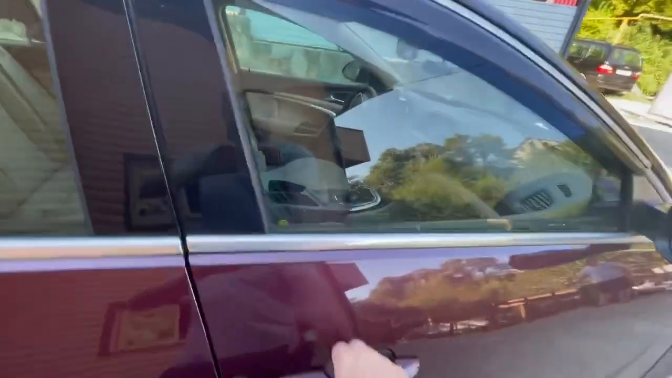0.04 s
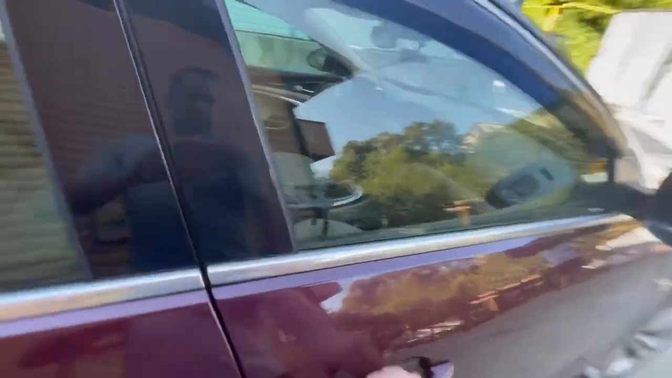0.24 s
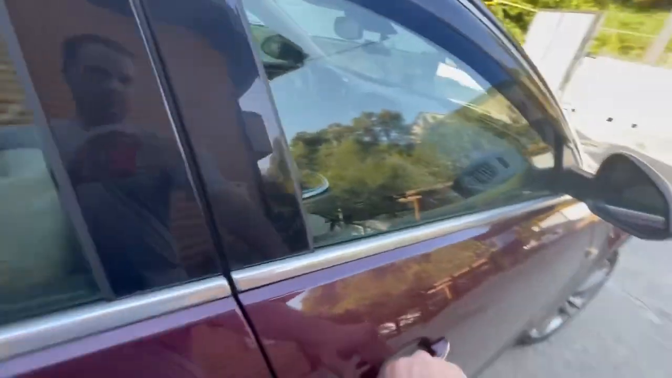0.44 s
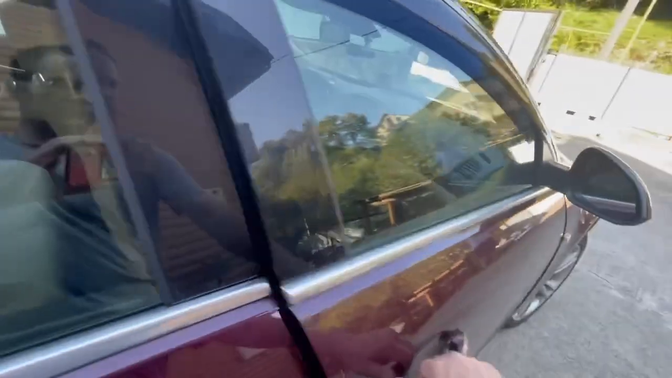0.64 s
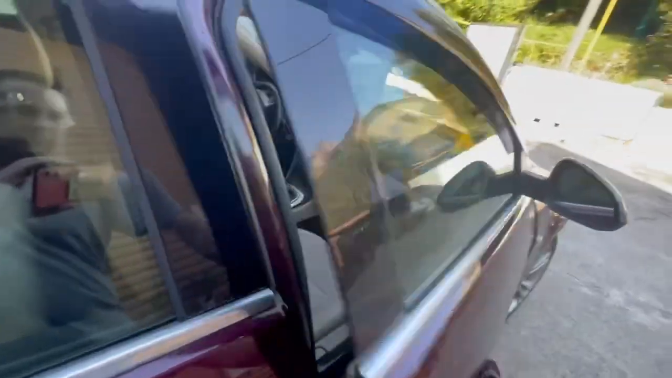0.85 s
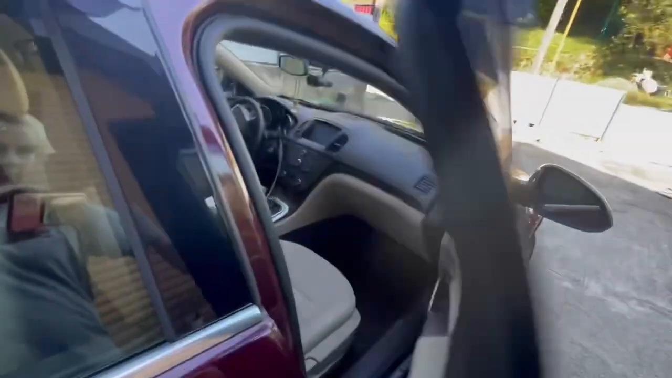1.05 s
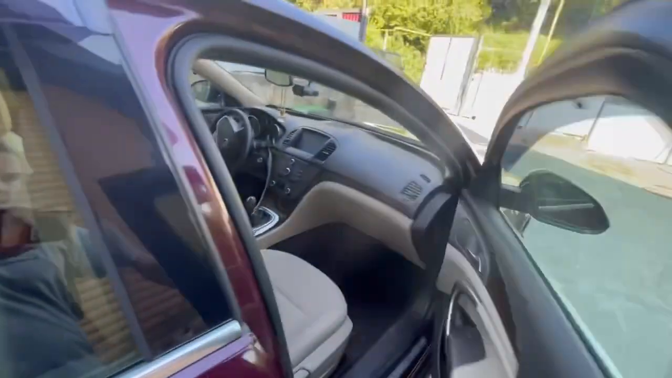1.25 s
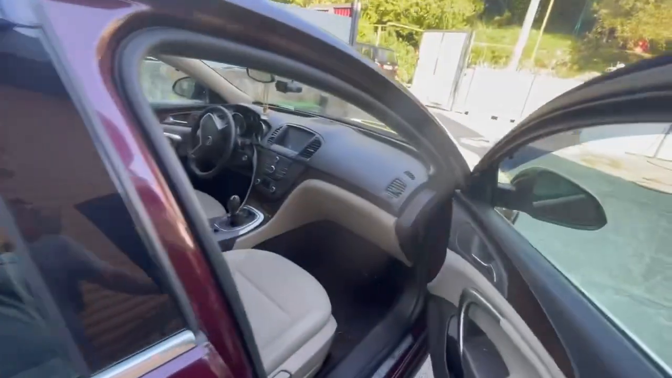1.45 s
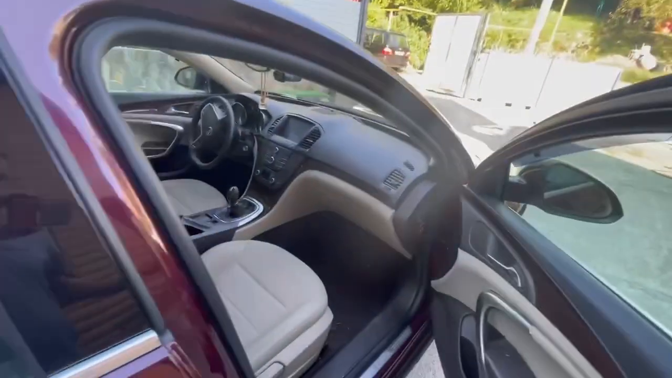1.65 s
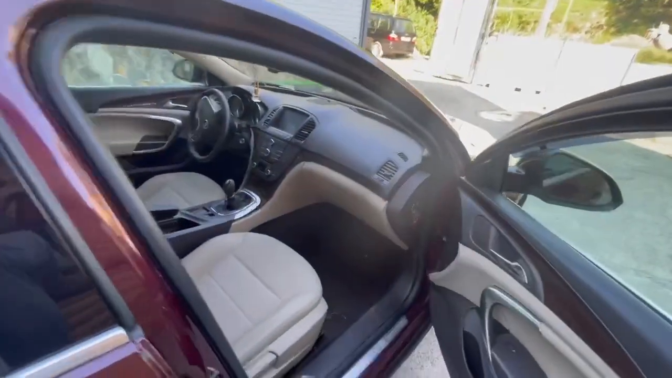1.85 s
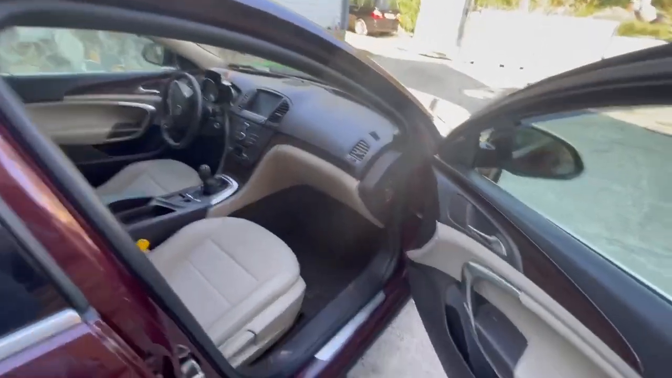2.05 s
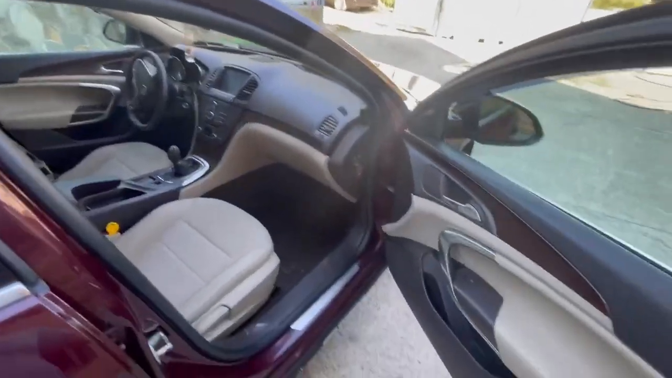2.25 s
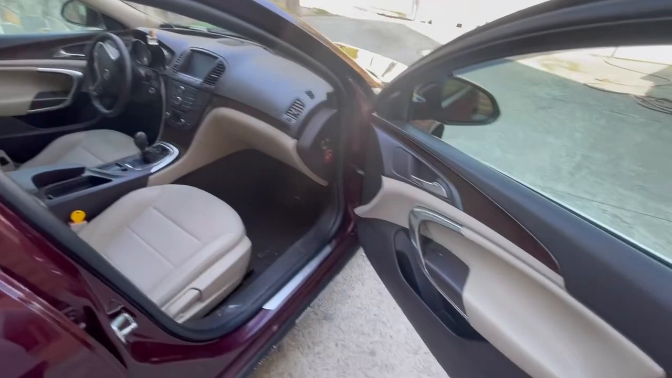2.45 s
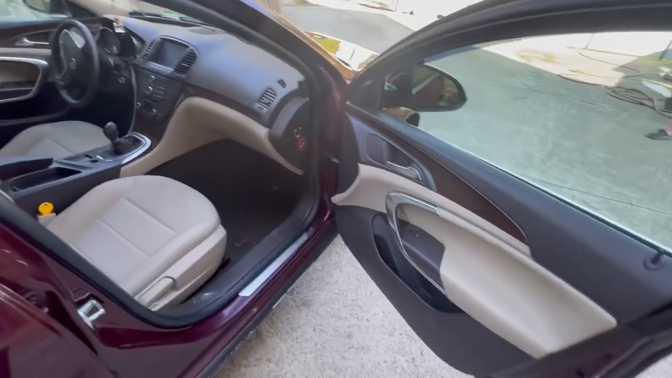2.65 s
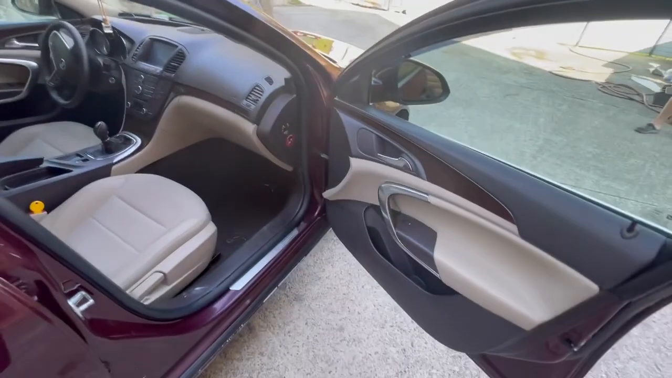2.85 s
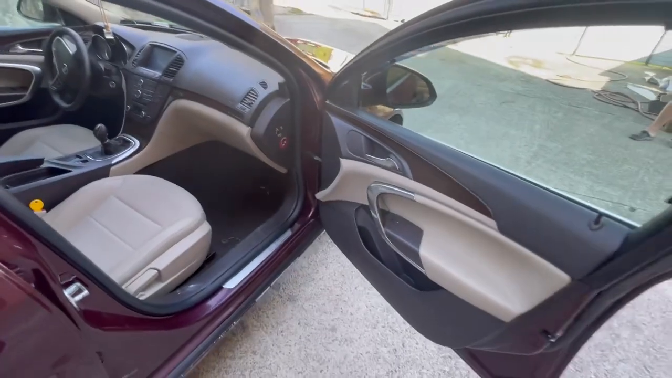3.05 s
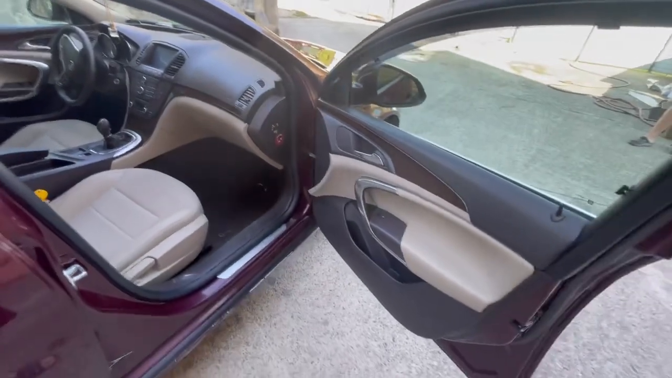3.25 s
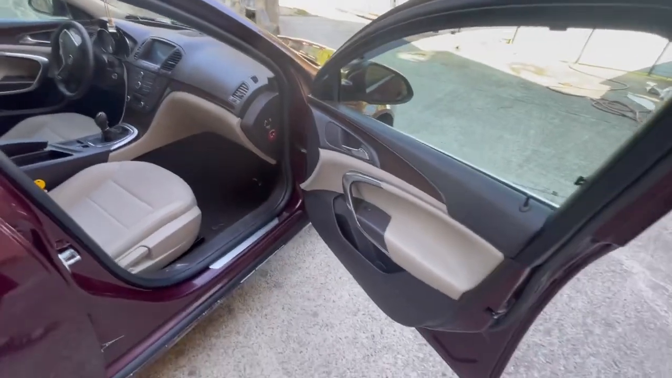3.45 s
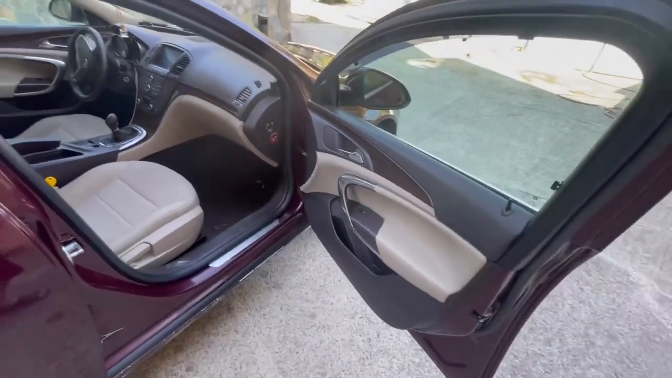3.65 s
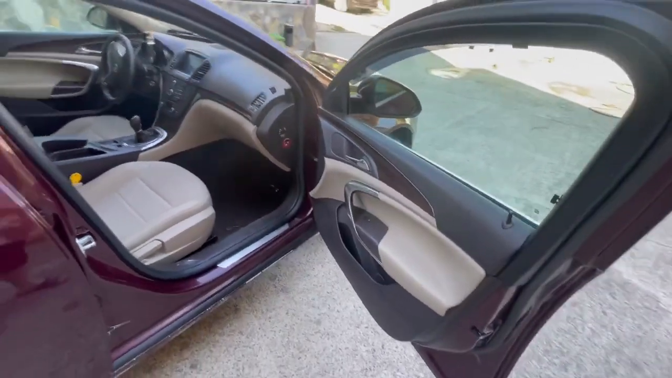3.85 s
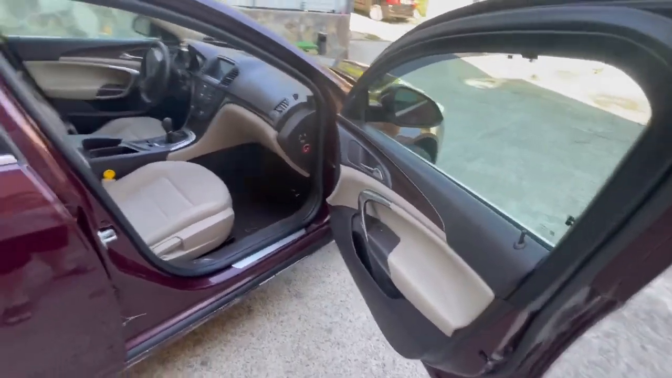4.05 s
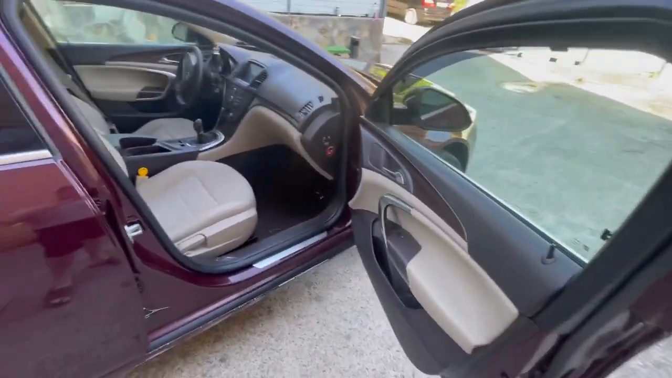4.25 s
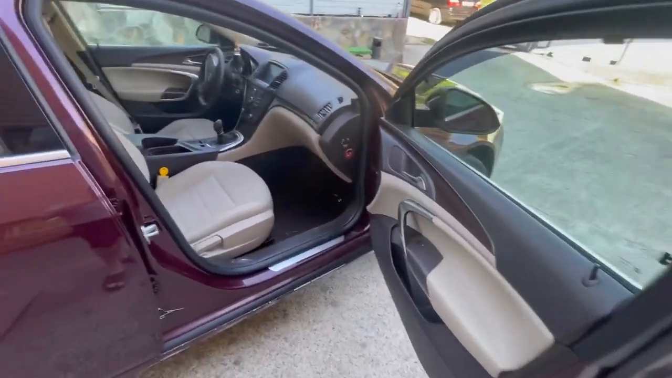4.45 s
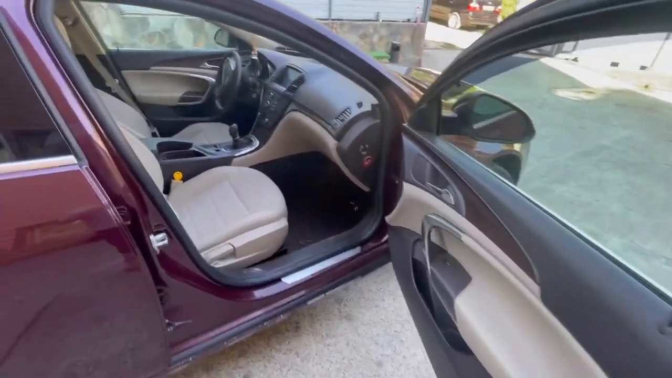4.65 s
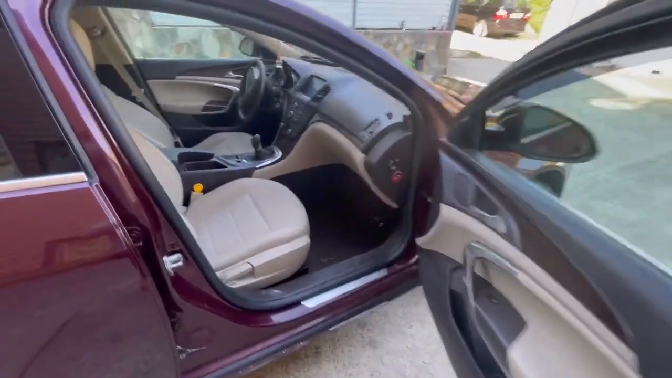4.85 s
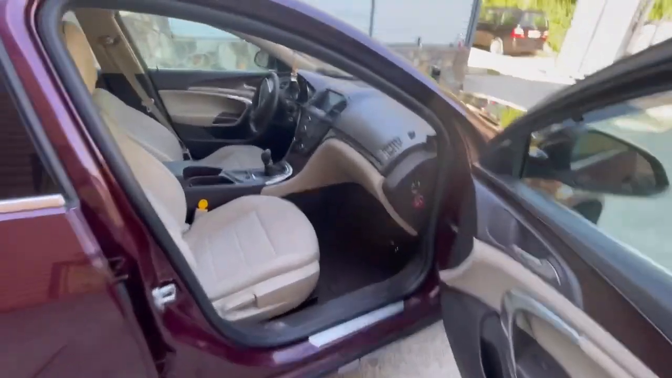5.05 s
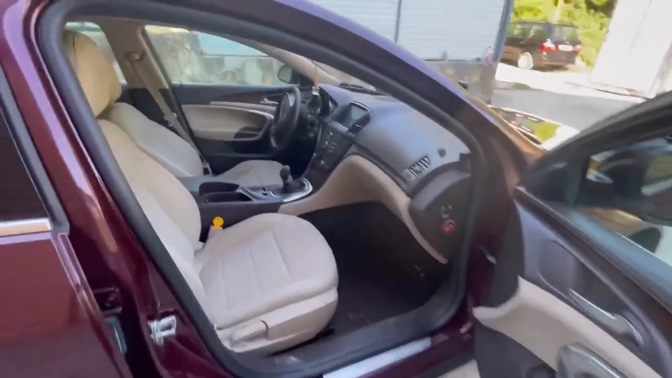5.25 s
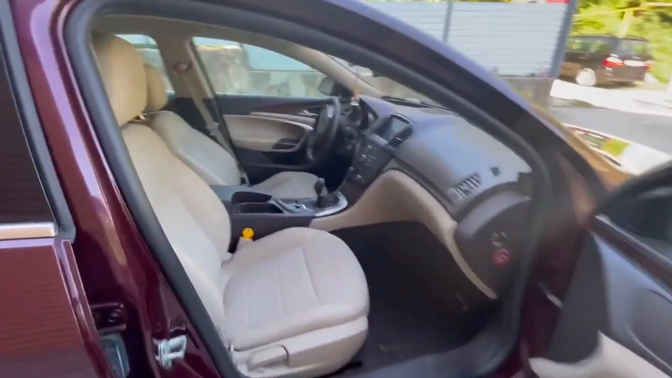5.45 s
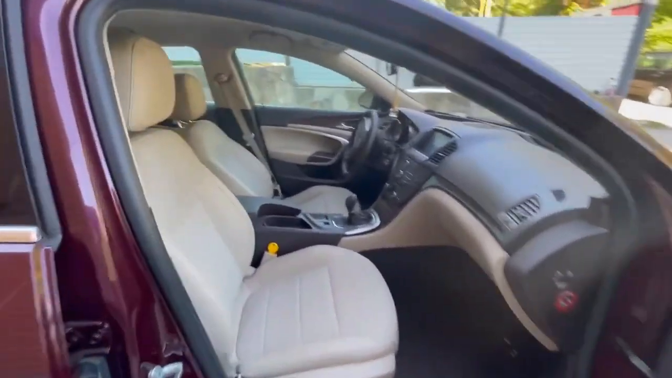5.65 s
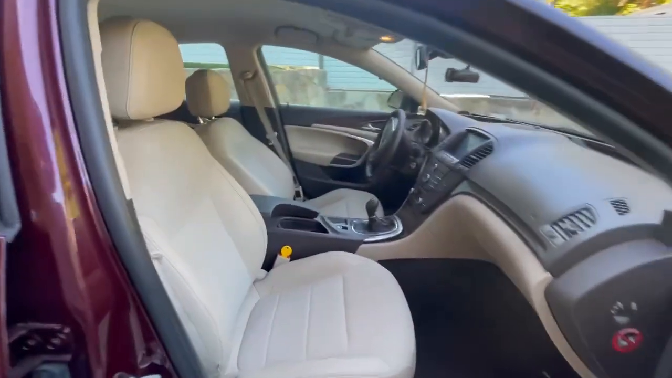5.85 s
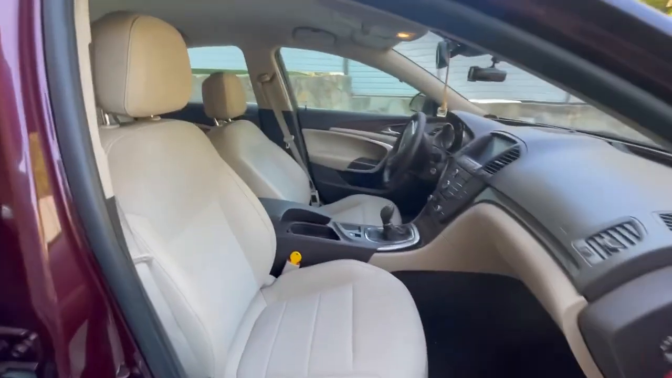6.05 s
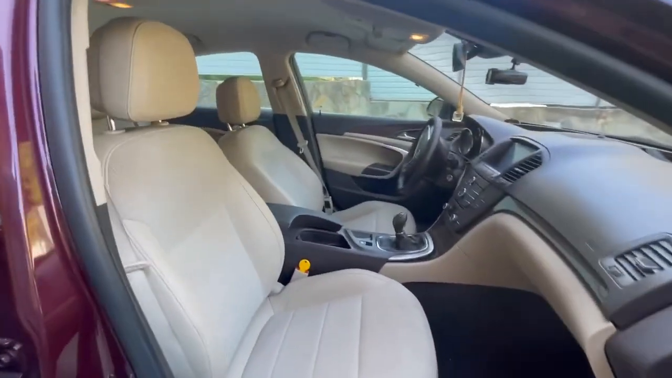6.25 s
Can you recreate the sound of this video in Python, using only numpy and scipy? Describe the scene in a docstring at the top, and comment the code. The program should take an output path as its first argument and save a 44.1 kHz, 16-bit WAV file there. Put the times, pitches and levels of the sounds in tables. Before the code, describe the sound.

Close up outdoors, a car door unlatches with a boomy clunk and swings open in spaced knocks, followed by light shoe scuffs and cloth rustle over distant traffic.

```python
"""Outdoors on gritty concrete, with distant traffic, a car's front door is opened close to a phone.
The handle is pulled and its pivot creaks; the latch lets go with a thud and the cabin air booms.
The check strap then knocks over its notches as the door swings, while shoes scuff and clothes rustle.
Blows and ticks are ringing modes plus short noise bursts; slides are trains of tiny blows.
Traffic, clothes and soles are coloured noise; the creak is a rough note with overtones."""
import sys
import numpy as np
from scipy import signal
from scipy.fft import rfft, irfft, next_fast_len
from scipy.io import wavfile
from scipy.ndimage import map_coordinates

SR = 44100
rng = np.random.default_rng(int(sys.argv[2]) if len(sys.argv) > 2 else 0)


def generate_wav(signal):
    """Clip the signal to [-1, 1] and save it as 16-bit WAV at the path in sys.argv[1]."""
    frames = np.transpose(np.atleast_2d(signal))
    scaled = np.clip(frames, -1, 1) * 32767
    pcm = np.round(scaled).astype(np.int16)
    wavfile.write(sys.argv[1], SR, pcm)


N = 278599
TIME = np.arange(N) / SR
RING_TIME = TIME[:2 ** 15]  # time axis of one ringing sound, s
TICK_SIZE = 2 ** 13  # samples
BANDS = 25 * 2 ** (np.arange(28) / 3)  # third-octave centres, Hz
TOP_HZ = 11900  # the phone passes nothing much above this

# Distant traffic, level before gusts: time_s, level_db
TRAFFIC_LEVEL = [(0, -52.5), (1.7, -51), (3.3, -53.5), (4, -53), (4.7, -50.5), (6.32, -51.5)]
# Relative colour of the traffic: pitch_hz, level_db
TRAFFIC_COLOUR = [(20, -27), (40, -10.5), (60, 8), (85, -2), (150, -3.5), (260, -8), (400, -6), (700, -9.5),
                  (950, -10.5), (1400, -23), (2300, -22.5), (3500, -32.5), (8000, -40), (10500, -76),
                  (12000, -86)]

# Relative colour of rubbing fabric: pitch_hz, level_db (per Hz)
CLOTH_COLOUR = [(500, 7.5), (1200, 5.5), (2200, 4), (3500, -5.5), (6000, -6.5), (9500, -8.5),
                (12000, -22.5)]
# Turns of the arm and body that rub the clothes: peak_s, half_length_s, level_db
TURNS = [(0.551, 0.05, -43.5), (0.587, 0.38, -55), (1.205, 0.31, -55.5), (3.143, 0.3, -55.5),
         (4.926, 0.19, -54.5)]
STIR_DB = -65  # clothes between the turns, before the fits and starts

# Soles dragging on concrete: peak_s, rise_s, level_db, treble_tilt_db (per octave)
SCUFFS = [(0.206, 0.024, -49.5, 3), (2.504, 0.034, -59, 0.5), (2.713, 0.0075, -58.5, 3.5),
          (2.956, 0.014, -56.5, 1.5), (3.264, 0.017, -59.5, 9), (3.353, 0.014, -43, 8),
          (3.703, 0.017, -49, 0.5), (3.741, 0.016, -52.5, -1.5), (3.923, 0.0053, -58, 12),
          (4.068, 0.0082, -49.5, 29), (4.26, 0.045, -57, -2), (4.83, 0.014, -47.5, 2.5),
          (5.105, 0.018, -48.5, -4), (5.399, 0.0086, -42, 3), (5.426, 0.0048, -43, 5),
          (5.452, 0.02, -44, 5), (5.495, 0.042, -47.5, 4), (6.024, 0.0079, -55.5, 6),
          (6.279, 0.038, -57, 5)]
# Relative colour of a sole before its tilt: pitch_hz, level_db (per Hz)
SOLE_COLOUR = [(400, -6), (1000, 3.5), (2200, 1), (3300, 0.5), (5500, -5), (9500, -12), (12000, -25.5)]
FALL_S, FALL_PER_RISE = 0.0073, 0.92  # a slow drag also takes longer to stop

# Loose grit under the shoes; each grain is louder than GRIT_DB by a random amount
GRIT_PER_S, GRIT_DB, GRIT_SPREAD_DB, GRIT_TILT_DB = 0.7, -32.5, 4, -6  # tilt is per octave
DRAG_GRIT_PER_S, DRAG_GRIT_REF_DB = 260, -44  # extra grains per s under a drag of this level

# Dry ticks of small parts in handle and door, and of grit under the shoes; tick levels are relative:
# start_s, level_db, treble_tilt_db (per octave), ping_hz, ping_db
TICKS = [(0.027, -32, -11, 1415, -38), (0.044, -29, 3.5, 1350, -36), (0.1943, 3, 3, 2450, -32),
         (0.201, -6, -4, 5680, -42), (0.282, -8, -5, 5630, -55), (0.327, -24, -12, 1460, -42),
         (0.341, -13, -4, 1500, -40), (0.359, -10.5, 1, 2350, -39), (0.387, -2, 1, 3150, -31.5),
         (0.393, -6, -2, 1950, -30), (0.445, -18, 0, 1280, -40), (0.476, -17, -6, 1450, -40),
         (0.515, -10, -2, 1300, -41), (0.534, -4, -8, 5100, -34), (0.552, 1, -7, 3140, -27),
         (0.557, -10, 6, 1940, -35), (0.565, -7, -9, 2440, -30), (0.575, -7, -6, 1573, -29),
         (0.59, -10.5, 0, 2300, -36), (0.685, -29, -8, 1480, -44), (0.702, -10, -6.5, 5810, -47),
         (0.739, -10.5, -3.5, 1790, -43), (0.864, -11.5, -1, 6000, -61), (0.964, -20, -4, 2880, -45),
         (1.064, -13, -8, 1220, -35), (1.171, -18, -0.5, 5000, -58), (1.263, -17, -9, 2100, -48),
         (1.28, -8, -11, 2600, -37), (1.288, 7.5, -3, 6020, -23), (1.292, 10.5, -4, 2050, -18),
         (1.299, -3, -14, 3630, -36), (1.434, -9, -3.5, 1600, -14), (1.835, -10, -6, 2280, -48),
         (2.086, 1.5, -8, 4030, -31.5), (2.358, -17, -10, 1600, -35), (2.372, -17.5, -11, 1710, -33),
         (2.497, 1.5, -3.5, 1890, -30), (2.508, 0, -4.5, 1900, -37), (3.267, -15.5, -8, 2300, -58),
         (3.340, 0, 2, 5150, -37), (3.342, -9.5, 5, 1440, -35.5), (3.361, -5, -2, 5260, -39),
         (3.371, -13, 3, 10000, -51), (3.832, -19, -6, 1900, -57), (3.995, -23, -11, 1320, -52),
         (4.817, -13, -1, 1920, -54), (4.832, -14, 0, 6060, -46), (5.097, -22.5, 6.5, 4500, -49),
         (5.425, -18, 6, 2460, -45), (5.977, -23, 3.5, 4370, -61), (6.022, -23, -11, 1230, -42)]
# Relative colour of a tick before its tilt: pitch_hz, level_db
TICK_COLOUR = [(200, -47), (800, -17), (1800, -6), (2450, -7), (3300, -15.5), (5000, -8.5), (6600, -8.5),
               (8400, -11), (10000, -11), (12000, -34)]
# Pitches where the ticks ring: pitch_hz
TICK_PEAKS_HZ = [1820, 2510, 4420, 4610, 4860, 5730, 6350, 6850, 8960, 9940]
PING_T60 = 0.034  # s for a small part's ping to fall 60 dB

# Handle pivot creaking under the pull, before unsteadiness: time_s, slips_per_s, level_db
CREAK_PATH = [(.425, 460, -58), (.445, 480, -41), (0.471, 390, -38), (.49, 445, -38.5), (.512, 438, -38),
              (.535, 415, -53)]
# The creak's note and its next multiples: level_db
CREAK_OVERTONES_DB = [7, -29, -15, -37]
# Handle linkage rubbing as it is pulled: time_s, level_db (relative)
HANDLE_PULL = [(.39, -41), (.42, -34.5), (.45, -39), (.48, -38), (.53, -49), (.56, -68)]
# Check strap sliding through its rollers: time_s, level_db (relative)
STRAP_SLIDE = [(.955, -61), (.975, -40), (1.02, -47), (1.07, -45), (1.13, -84)]
# Handle lever ringing as it meets the pawl: pitch_hz, level_db, t60_s
LEVER_MODES = [(426, -22.5, 0.15), (635, -25, 0.15)]
LEVER_S = 0.394

# Air in the cabin booms as the seal lets go
CABIN_HZ, CABIN_T60, CABIN_DB, UNSEAL_S = 61.4, 0.4, -18.5, 0.556

# Blows in order: handle, lever on pawl, latch and seal, check strap and its notches, door on its stop.
# start_s, knock_db (relative), bass_db (beside the knock), contact_hz (treble cut),
# spot_hz (note of the struck spot), spot_db
BLOWS = [ (0.027, 0, 8, 1000, 430, -37.5), (0.044, 3, 7.5, 1420, 395, -35.5),
         (0.283, 4.5, 11.5, 800, 411, -31.5), (0.358, 2.5, 2, 2900, 1240, -41),
         (0.385, 12, -8, 3200, 1560, -23), (0.394, 13.5, -3, 2100, 1296, -23),
         (0.535, 9, 10, 2860, 434, -42), (0.547, 27, 5, 930, 509, -16), (0.553, 22.5, 6.5, 1340, 1050, -12),
         (0.572, 15.5, 11.5, 1050, 530, -29), (0.589, 11.5, 7, 1480, 172, -30),
         (0.660, 5.5, 10, 820, 734, -33), (0.738, 2.5, -33, 1290, 900, -44),
         (0.778, -9, -7, 1390, 810, -46), (0.962, 6, -13, 1520, 750, -34.5),
         (0.973, 7.5, 0.5, 1690, 1250, -33.5), (1.010, 9, 2.5, 525, 274, -40),
         (1.062, 8.5, 7, 1310, 397, -32.5), (1.284, 11, -13, 2920, 2100, -32),
         (1.289, 24, -21, 3140, 1108, -11), (1.299, 27.5, 4, 1210, 373, -25),
         (1.314, 19.5, 12.5, 800, 233, -22), (1.421, 15.5, 8, 1500, 233, -31),
         (1.4338, 23.5, -20, 1480, 1050, -13.5), (1.438, 21, -18, 1430, 458, -15),
         (1.836, -2, 16, 1590, 412, -37.5), (2.049, 2, 3, 695, 566, -48), (2.066, 5.5, -3, 900, 700, -44),
         (2.0846, 26, -11, 1860, 997, -17), (2.090, 22, -5, 1100, 666, -15),
         (2.3439, 12.5, -2.5, 1420, 820, -32), (2.356, 12, -12, 1450, 307, -26),
         (2.37, 16, -6, 1500, 463, -28), (2.413, 3.5, 4, 1210, 375, -44), (2.430, 5.5, -1, 740, 303, -36),
         (2.442, 5, 5.5, 690, 446, -36)]
SPOT_CYCLES = 39  # a struck spot's note falls 60 dB in this many cycles
FREE_S = 0.85  # blows before this use the shut door, later ones the free door

# In the next five tables levels are relative, and each blow scales the ring times.
# Skin, trim and glass struck at the latch: pitch_hz, level_db, t60_s, left_minus_right_db
SHUT_MODES = [(105.7, 3.5, 0.29, 1), (122.2, 7.5, 0.12, -2), (178.1, 2, 0.3, -3), (204.2, 4, 0.17, -4),
              (344, -4, 0.14, -2), (387.7, 7.5, 0.11, -14), (425.7, 7.5, 0.17, 5.5), (458, -0.5, 0.2, -13),
              (491, 7.5, 0.12, 7), (570, -16, 0.12, 7), (646, -4.5, 0.13, 8), (872, -2, 0.11, 7),
              (1028, 2, 0.15, 4), (1250, 1, 0.062, 12), (1536, 5, 0.041, 11), (1800, 7, 0.044, 10)]
# Door hanging free, struck at the strap: pitch_hz, level_db, t60_s, left_minus_right_db
FREE_MODES = [(70, -7, 0.63, 0), (79.8, -15, 0.67, 0), (93, -8.5, 0.61, 3.5), (128.8, -8.5, 0.46, 0),
              (154.2, 3, 0.16, 3), (170.3, 1, 0.11, -15), (227.6, 1, 0.24, -9), (278, -2, 0.19, -6),
              (300.5, -1.5, 0.27, 6), (359.7, 0.5, 0.35, -7), (383.4, -2.5, 0.26, 3), (424, 2, 0.3, -0.5),
              (496.4, -0.5, 0.35, 4), (671, 5.5, 0.064, 2.5), (808, 4, 0.082, 14),
              (1027, -4.5, 0.14, -22.5), (1148, 1.5, 0.086, -2), (1322, 3, 0.089, 6),
              (1623, -1.5, 0.054, 22.5), (1727, 5, 0.039, -2), (2028, 6, 0.064, 16), (2335, 11, 0.098, 5)]
# Steel of latch, strap and hinges: pitch_hz, level_db, t60_s
STEEL_MODES = [(2040, 22, 0.14), (2180, 19, 0.12), (2680, 14.5, 0.15), (2743, 17, 0.097), (3230, 24, 0.08),
               (3440, 13, 0.12), (4150, 20, 0.07), (4940, 12, 0.1), (6170, 14, 0.14), (6550, 7, 0.15),
               (7460, 5, 0.12), (9300, -14, 0.12)]
# Crowd of close modes between the clear ones: pitch_hz, level_db
DOOR_BODY = [(25, -6), (55, -21), (85, -3.5), (130, -5.5), (220, -0.5), (450, -4), (750, -5.5), (1050, -6),
             (1500, -9), (2100, -6), (3000, -15), (12000, 22)]
# How long that crowd rings: pitch_hz, t60_s
DOOR_T60 = [(60, 0.89), (150, 0.3), (400, 0.22), (1000, 0.17), (2200, 0.17), (5000, 0.13), (11000, 0.086)]
# Relative colour of the metal click: pitch_hz, level_db
METAL = [(300, -42), (1000, -2), (2200, 16), (3300, 11), (6000, -10), (9000, -24), (12000, -9)]

# A higher contact_hz shortens the ring and lowers the added click
RING_CORNER_HZ, RING_POWER, CLICK_DB_PER_HZ = 1150, 0.11, -0.0021
LATCH_CLICK_DB, STRAP_CLICK_DB = -47.5, -55  # the latch is nearer than the strap
RING_DB_PER_BASS_DB = 0.2662  # a blow with the door's weight behind it rings on longer

# Stereo width of near sounds: pitch_hz, side_re_mid_db
NEAR_SIDE = [(60, -1), (250, -15.5), (500, -2.5), (1000, 0), (2200, 1), (5000, -1)]
# Stereo width of the traffic, soles and clothes: pitch_hz, side_re_mid_db
FAR_SIDE = [(60, -3.5), (250, -10.5), (500, 1.5), (1000, 0), (2200, 0), (5000, -0.5)]
# Balance of the two microphone ports: pitch_hz, left_minus_right_db
BALANCE = [(60, -3), (150, -0.5), (500, -1), (1000, 2), (2200, 1), (5000, 2), (9000, -3)]


def amp(db):
    """Turn decibels into gain."""
    return 10 ** (np.asarray(db) / 20)


def at(table, hz):
    """Read (pitch, value) points on a log-frequency axis."""
    f, value = np.transpose(table)
    return np.interp(np.log(np.maximum(hz, 1)), np.log(f), value)


def curve(table):
    """Join (time, value) points by straight lines."""
    return np.interp(TIME, *np.transpose(table))


def unit(x):
    """Scale to an rms of 1."""
    return x / np.sqrt(np.mean(x ** 2))


def add(out, start_s, sound):
    """Mix a stereo sound in at a time."""
    i = max(int(start_s * SR), 0)
    out[:, i:i + sound.shape[1]] += sound[:, :N - i]


def fade(t60, size=len(RING_TIME)):
    """A free ring dies away by 60 dB in t60 seconds."""
    return np.exp(-np.log(1000) * RING_TIME[:size] / t60)


def waver(step_s):
    """A random level glides to a new value at every step."""
    knots = np.arange(0, TIME[-1], step_s)
    return np.interp(TIME, knots, rng.standard_normal(len(knots)))


def mid_side(mid, side, spread):
    """Turn mid and side into left and right, with spread setting the width."""
    return np.array([mid + spread * side, mid - spread * side]) / np.hypot(1, spread)


def stereo(pair, colour, width):
    """Colour two unrelated signals and hear them as mid and side."""
    n = next_fast_len(pair.shape[1])
    hz = np.fft.rfftfreq(n, 1 / SR)
    mid, side = rfft(pair, n) * amp(at(colour, hz))
    ports = mid_side(mid, side, amp(at(width, hz)))
    return irfft(ports, n)[:, :pair.shape[1]]


def shimmer(pair, depth_db, step_s, width_hz):
    """Let each narrow band swell and sink on its own."""
    hz, times, cells = signal.stft(pair, SR, nperseg=1024)
    place = np.meshgrid(hz / width_hz, times / step_s, indexing="ij")
    random_map = rng.standard_normal((256, 256))
    levels = map_coordinates(random_map, place, order=1, mode="wrap")
    return signal.istft(cells * amp(depth_db * levels), SR)[1][:, :pair.shape[1]]


def grains(size, spread_db):
    """Two noise streams step in level every 80 samples: most slips are weak, a few strong."""
    strength = np.minimum(rng.exponential(size=size // 80 + 1), 4)
    return rng.standard_normal((2, size)) * amp(spread_db * np.repeat(strength, 80)[:size])


def mode(hz, t60):
    """One slightly detuned mode rings and reaches the two ports out of step."""
    place, detune = rng.standard_normal(2)
    lag = np.sign(place) * np.arctan(amp(at(NEAR_SIDE, hz))) * np.array([[1], [-1]])
    pitch = hz * (1 + 0.0056 * detune)
    swing = np.sign(detune) * np.sin(2 * np.pi * pitch * RING_TIME + lag)
    build = 1 - np.exp(-RING_TIME / (0.00089 + 1 / hz))
    return swing * fade(t60) * build


def clusters(centres_hz, width_hz=14, widening=0.0028, between=0.2, size=len(RING_TIME)):
    """Close modes gather round the strong ones and leave valleys in between."""
    hz = np.fft.rfftfreq(size, 1 / SR)
    hills = sum(1 / (1 + ((hz - f) / (width_hz + widening * f)) ** 2) for f in centres_hz)
    return np.sqrt(between + hills)


def crowd(gains, t60s, peaks, build_cycles, tail_db, tail_t60, rise_s,
          first_db=4, first_cycles=32, size=len(RING_TIME)):
    """Third-octave noise stands for countless modes: a first wave, the ring, a faint tail from the yard."""
    hz = np.fft.rfftfreq(size, 1 / SR)
    noise = rfft(rng.standard_normal((2, size))) * peaks
    tail, out = amp(tail_db) * fade(tail_t60, size), 0
    for centre, gain, t60 in zip(BANDS, gains, t60s):
        band = abs(np.log2((hz + 1) / centre)) < 1 / 6
        build_s = rise_s + build_cycles / (centre + 100)  # low notes come late
        build = 1 - np.exp(-(RING_TIME[:size] / build_s) ** 2)
        first = amp(first_db) * fade(min(t60, 0.02 + first_cycles / centre), size)
        pair = irfft(noise * band, size) * build * (first + fade(t60, size) + tail)
        # Set each band's energy after shaping it
        energy = np.sum(pair ** 2, axis=1, keepdims=True)
        mid, side = pair * gain * np.sqrt(band.mean() / energy)
        out = out + mid_side(mid, side, amp(at(NEAR_SIDE, centre)))
    return out


def traffic(gust_db=1.16):
    """A far rumble swells slowly and wavers on the air."""
    gusts = waver(.08)
    rumble = stereo(rng.standard_normal((2, N)), TRAFFIC_COLOUR, FAR_SIDE)
    rumble = shimmer(rumble, depth_db=3.5, step_s=.09, width_hz=110.2)
    return unit(rumble) * amp(curve(TRAFFIC_LEVEL) + gust_db * gusts)


def cloth(fits_db=1.5):
    """Fabric rubs in fits and starts as the body turns; its colour shifts with the folds."""
    fits = waver(.025)
    turns = sum(amp(db) ** 2 * np.exp(-((TIME - peak_s) / half_s) ** 2) for peak_s, half_s, db in TURNS)
    power = amp(STIR_DB) ** 2 + turns
    rub = stereo(grains(N, spread_db=1.5), CLOTH_COLOUR, FAR_SIDE)
    rub = shimmer(rub, depth_db=4.5, step_s=.04, width_hz=260)
    return unit(rub) * np.sqrt(power) * amp(fits_db * fits)


def scuff(rise_s, fall_s, db, tilt_db, jerk_db=2.0):
    """A sole grinds over grit in jerks: the crackle swells for three rise times, then dies away."""
    colour = [(hz, level + tilt_db * np.log2(hz / 4000)) for hz, level in SOLE_COLOUR]
    past = RING_TIME - 3 * rise_s
    swell = np.exp(-(np.minimum(past, 0) / rise_s) ** 2 - np.maximum(past, 0) / fall_s)
    jerks = waver(.008)[:len(RING_TIME)]
    crackle = stereo(grains(len(RING_TIME), spread_db=0.8), colour, FAR_SIDE)
    crackle = shimmer(crackle, depth_db=8.0, step_s=0.0397, width_hz=150)
    return amp(db + jerk_db * jerks) * swell * unit(crackle)


def tick(db, tilt_db):
    """A small hard thing snaps: a very short noise burst with a faint tail."""
    tilt = tilt_db * np.log2(np.maximum(BANDS, 700) / 4000)
    gains = amp(db + at(TICK_COLOUR, BANDS) + tilt)
    peaks = clusters(TICK_PEAKS_HZ, between=0.12, size=TICK_SIZE)
    return crowd(gains, np.full(len(BANDS), .016), peaks, build_cycles=0.61, tail_db=-16.5,
                 tail_t60=0.25, rise_s=0.00062, size=TICK_SIZE)


def grit():
    """Faint grains crack at random moments, thickest under a dragging sole."""
    drag = sum(amp(db - DRAG_GRIT_REF_DB) * np.exp(-((TIME - peak_s - rise_s) / (2 * rise_s)) ** 2)
               for peak_s, rise_s, db, _ in SCUFFS)
    strength = np.minimum(rng.exponential(size=N), 3)
    chance = (GRIT_PER_S + DRAG_GRIT_PER_S * drag) / SR
    cracks = (rng.random(N) < chance) * amp(GRIT_SPREAD_DB * strength)
    return signal.fftconvolve(cracks[None], tick(GRIT_DB, GRIT_TILT_DB), axes=1)[:, :N]


def creak(jitter=0.091, rough_db=4.5):
    """The pivot sticks and slips fast enough to make a short, rough note."""
    times, rate, db = np.transpose(CREAK_PATH)
    unsteady, grip = waver(.002), waver(.003)
    slip_rate = np.interp(TIME, times, rate) * (1 + jitter * unsteady)
    phase = 2 * np.pi * np.cumsum(slip_rate) / SR
    note = unit(sum(amp(level) * np.sin(k * phase) for k, level in enumerate(CREAK_OVERTONES_DB, 1)))
    moving = (TIME > times[0]) * (TIME < times[-1])
    return note * amp(np.interp(TIME, times, db) + rough_db * grip) * moving


def slide(levels, modes, contact_hz, slips_per_s=260, slip_spread_db=6.5):
    """A sliding part catches and slips in fine steps, each a tiny blow on the door."""
    strength = np.minimum(rng.exponential(size=N), 3)
    slips = unit((rng.random(N) < slips_per_s / SR) * amp(slip_spread_db * strength))
    moving = (TIME > levels[0][0]) * (TIME < levels[-1][0])
    slips = slips * amp(curve(levels)) * moving
    panel = door(modes, knock_db=7, bass_db=6.5, contact_hz=contact_hz, click_db=-51, ring=0.32)
    panel = panel / np.sqrt(np.sum(panel[0] ** 2))
    return signal.fftconvolve(slips[None], panel, axes=1)[:, :N]


def lever():
    """The handle's lever rings as it meets the pawl."""
    return sum(amp(db) * mode(hz, t60) for hz, db, t60 in LEVER_MODES)


def cabin():
    """The sudden suction rings the lowest mode of the air inside the car."""
    swing = np.sin(2 * np.pi * CABIN_HZ * RING_TIME)
    boom = swing * fade(CABIN_T60) * (1 - np.exp(-RING_TIME / 0.0014))
    return amp(CABIN_DB) * np.array([boom, boom])


def contact(hz, bass_db, contact_hz, shelf_hz=230, steep=5.17):
    """Spectrum of a push: the door's weight changes the bass, a soft contact takes off the top."""
    bass = amp(bass_db / (1 + (hz / shelf_hz) ** 4))
    return bass / np.hypot(1, (hz / contact_hz) ** steep)


def door(modes, knock_db, bass_db, contact_hz, click_db, ring, panel_db=-58, steel_db=-43,
         crowd_db=-2.0, metal_db=9.0, spot_db=1.15):
    """A struck door rings in clear modes and a crowd between them, with a click of steel on steel."""
    body = amp(knock_db + at(DOOR_BODY, BANDS)) * contact(BANDS, bass_db, contact_hz)
    click = amp(click_db + metal_db + at(METAL, BANDS))
    peaks = clusters([row[0] for row in modes + STEEL_MODES])
    out = amp(crowd_db) * crowd(np.hypot(body, click), ring * at(DOOR_T60, BANDS), peaks,
                                build_cycles=0.75, tail_db=-22.5, tail_t60=0.57, rise_s=0.0003)
    for hz, db, t60, pan_db in modes:
        # Each mode is a little stronger or weaker by the spot struck
        ports = amp(np.array([[pan_db], [-pan_db]]) / 2 + spot_db * rng.standard_normal())
        push = contact(hz, bass_db, contact_hz)
        out += amp(panel_db + knock_db + db) * push * ports * mode(hz, ring * t60)
    for hz, db, t60 in STEEL_MODES:
        out += amp(steel_db + click_db + db) * mode(hz, ring * t60)
    return out


def blow(start_s, knock_db, bass_db, contact_hz):
    """One blow: its contact sets the steel click, and with the weight behind it, the ring time."""
    if start_s < FREE_S:
        modes, near_db = SHUT_MODES, LATCH_CLICK_DB
    else:
        modes, near_db = FREE_MODES, STRAP_CLICK_DB
    click_db = knock_db + near_db + CLICK_DB_PER_HZ * contact_hz
    ring = (RING_CORNER_HZ / contact_hz) ** RING_POWER * amp(RING_DB_PER_BASS_DB * bass_db)
    return door(modes, knock_db, bass_db, contact_hz, click_db, ring)


def scene():
    """Mix street, clothes, feet and door."""
    out = traffic() + cloth()
    for peak_s, rise_s, db, tilt_db in SCUFFS:
        add(out, peak_s - 3 * rise_s, scuff(rise_s, FALL_S + FALL_PER_RISE * rise_s, db, tilt_db))
    out += grit()
    for start_s, db, tilt_db, ping_hz, ping_db in TICKS:
        add(out, start_s, tick(db, tilt_db))
        add(out, start_s, amp(ping_db) * mode(ping_hz, PING_T60))
    out += creak()
    out += slide(HANDLE_PULL, SHUT_MODES, contact_hz=1460)
    out += slide(STRAP_SLIDE, FREE_MODES, contact_hz=1400)
    add(out, LEVER_S, lever())
    add(out, UNSEAL_S, cabin())
    for start_s, knock_db, bass_db, contact_hz, spot_hz, spot_db in BLOWS:
        add(out, start_s, blow(start_s, knock_db, bass_db, contact_hz))
        add(out, start_s, amp(spot_db) * mode(spot_hz, SPOT_CYCLES / spot_hz))
    return out


def record(dry):
    """The two ports differ a little in colour; the phone cuts the top."""
    n = next_fast_len(N + SR // 10)
    lean_db = at(BALANCE, np.fft.rfftfreq(n, 1 / SR)) / 2
    heard = irfft(rfft(dry, n) * amp([lean_db, -lean_db]), n)[:, :N]
    top_cut = signal.ellip(10, .2, 80, TOP_HZ, fs=SR, output="sos")
    return signal.sosfilt(top_cut, heard)


dry = scene()
out = record(dry)
generate_wav(out)
```